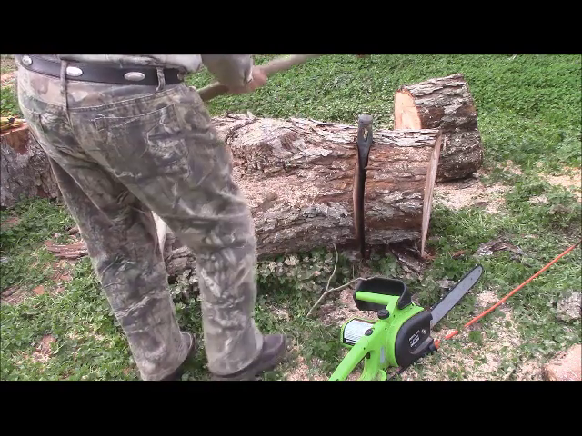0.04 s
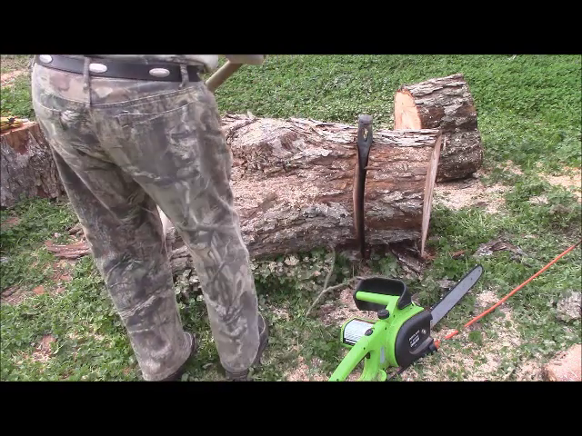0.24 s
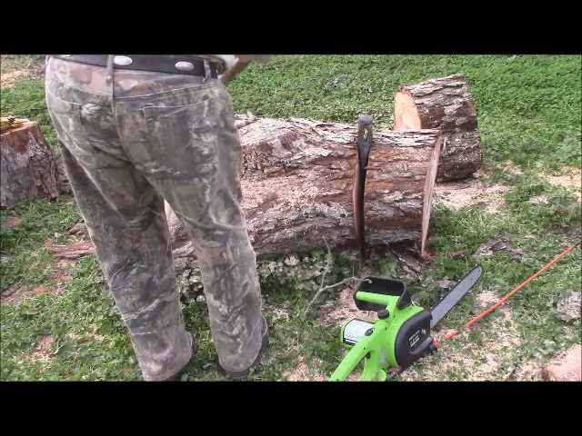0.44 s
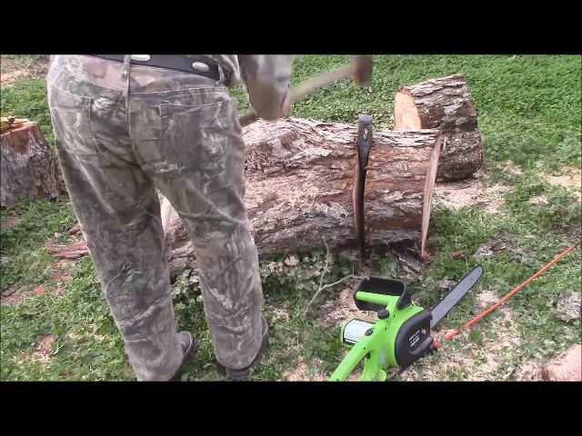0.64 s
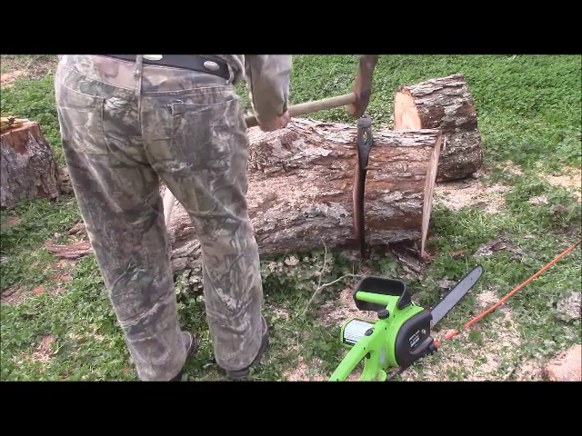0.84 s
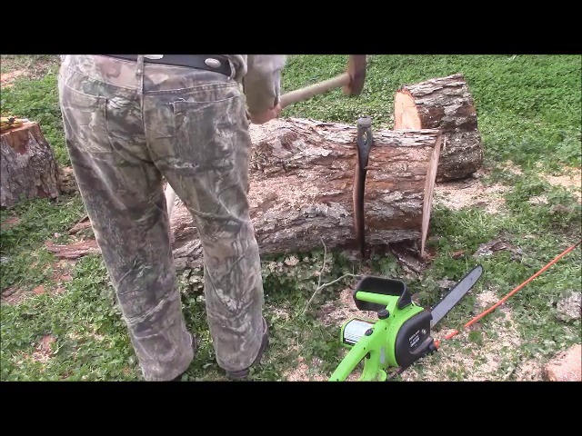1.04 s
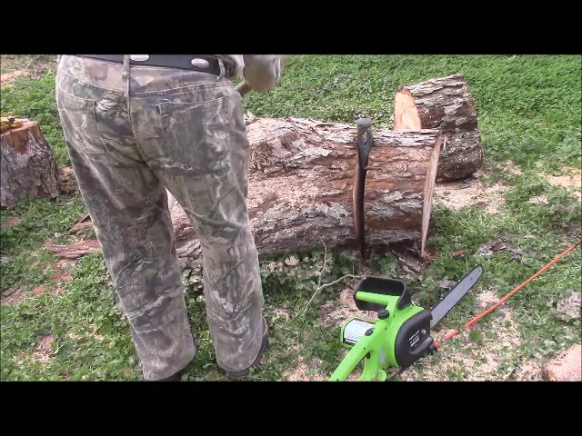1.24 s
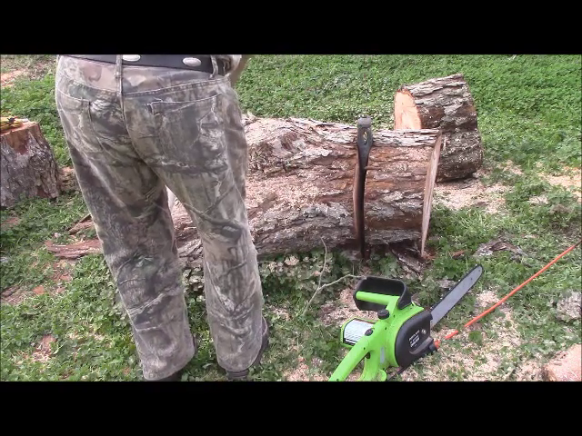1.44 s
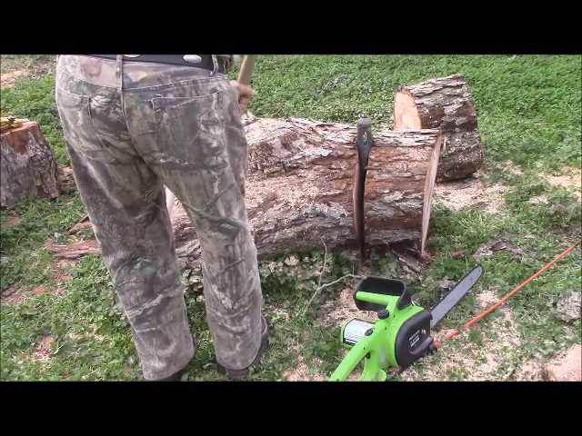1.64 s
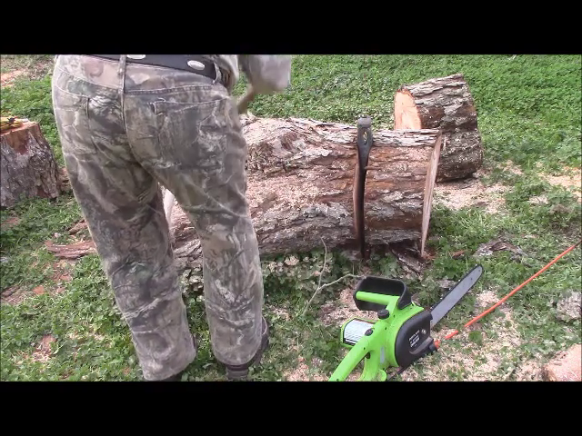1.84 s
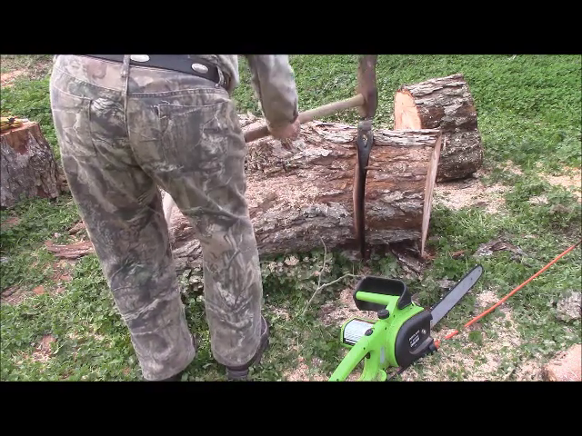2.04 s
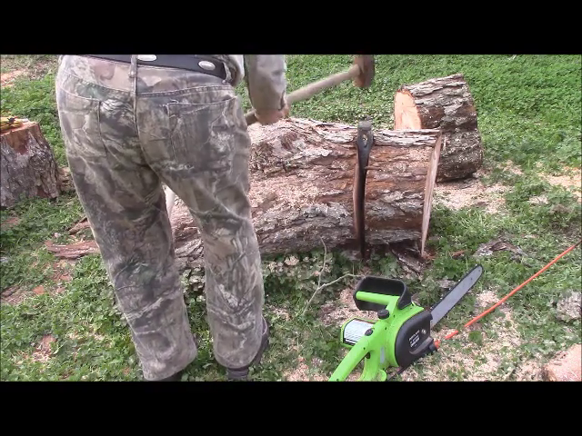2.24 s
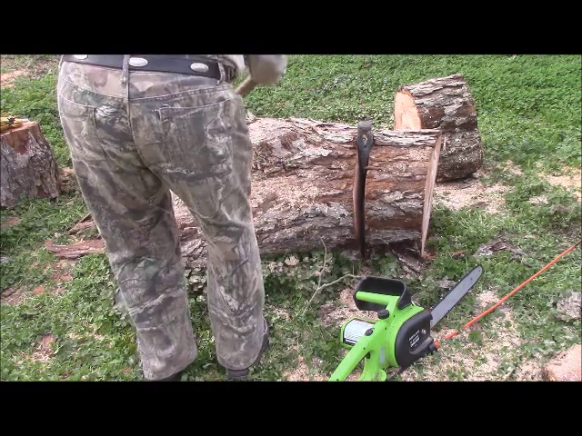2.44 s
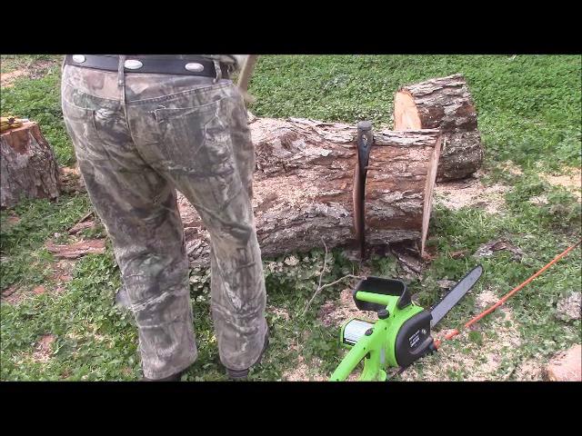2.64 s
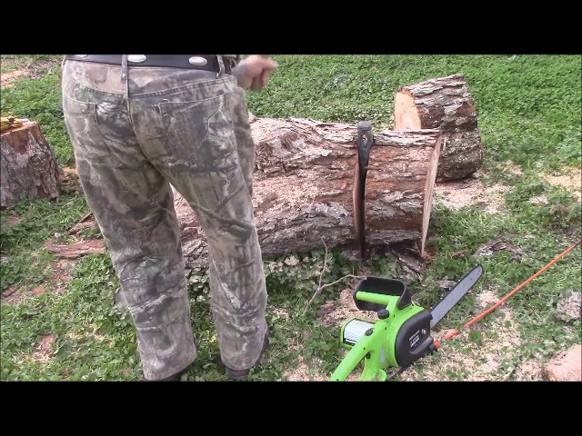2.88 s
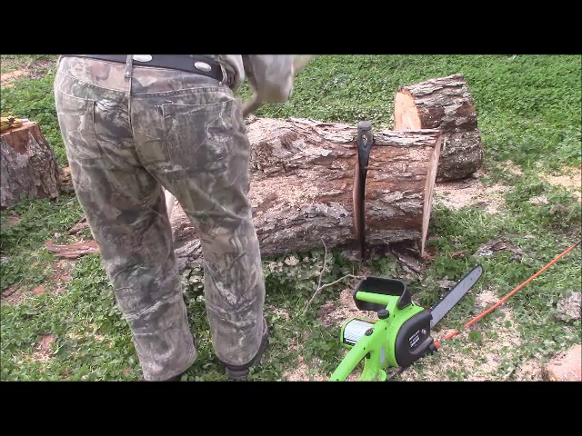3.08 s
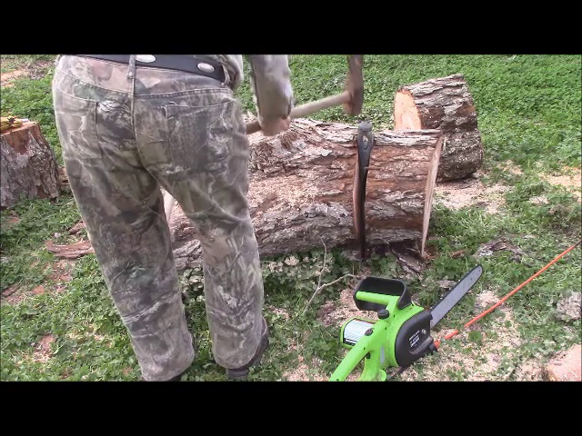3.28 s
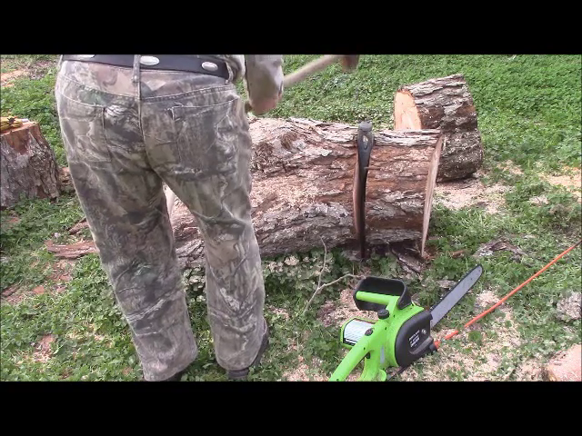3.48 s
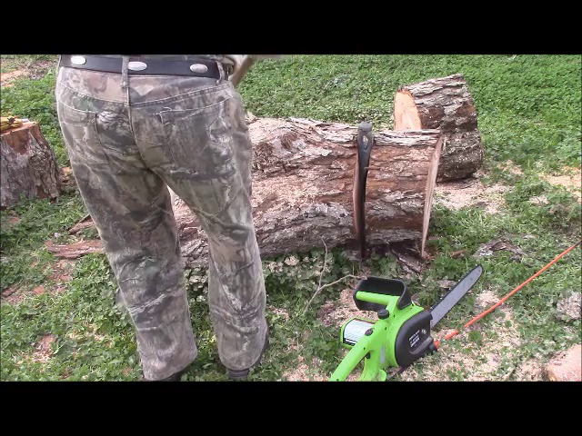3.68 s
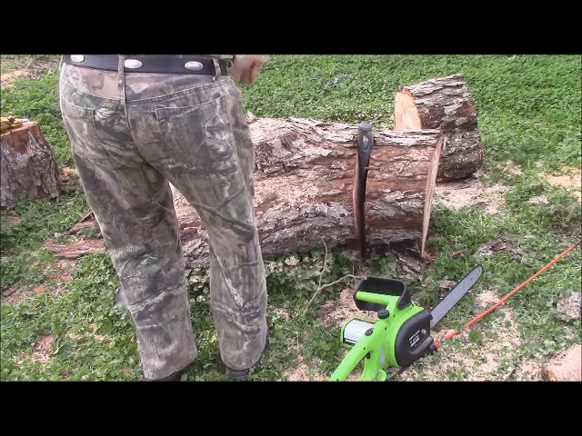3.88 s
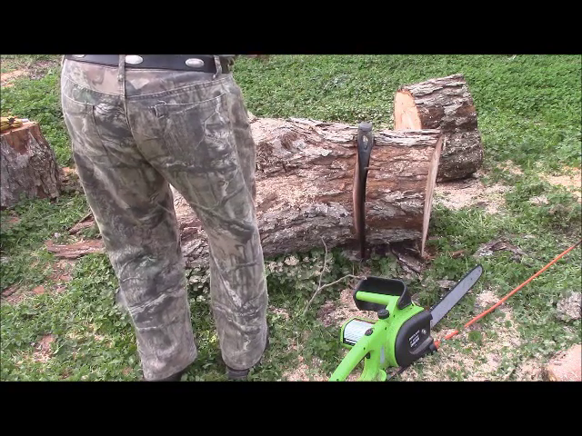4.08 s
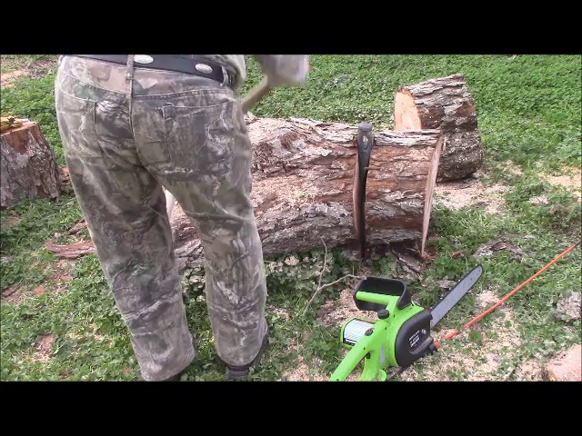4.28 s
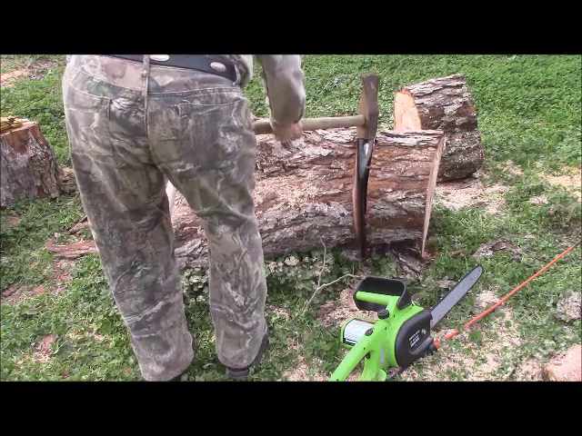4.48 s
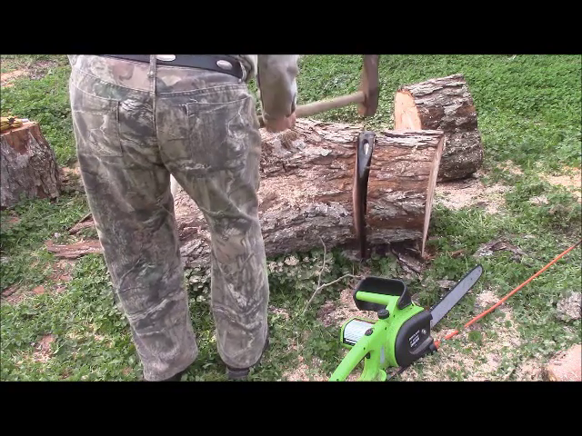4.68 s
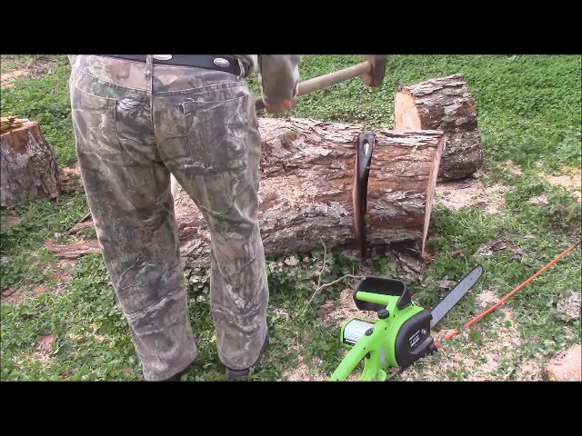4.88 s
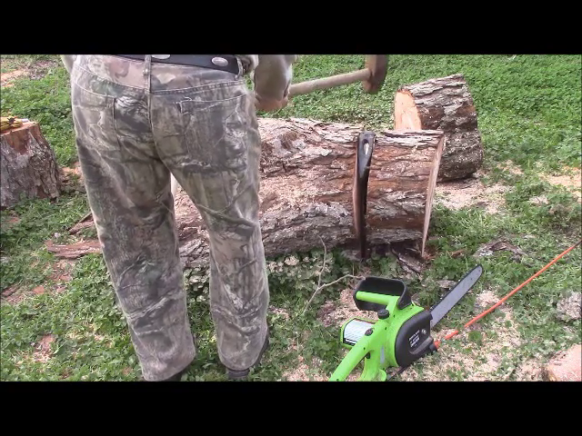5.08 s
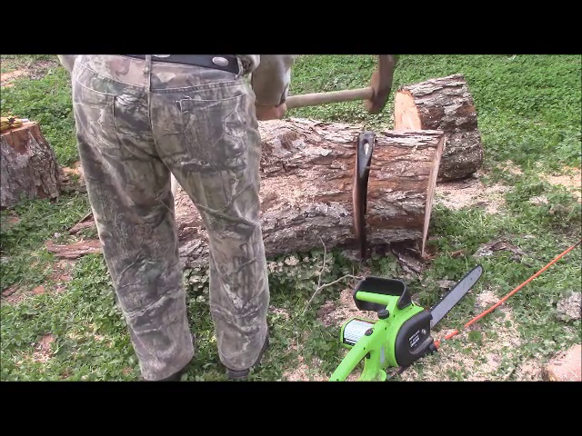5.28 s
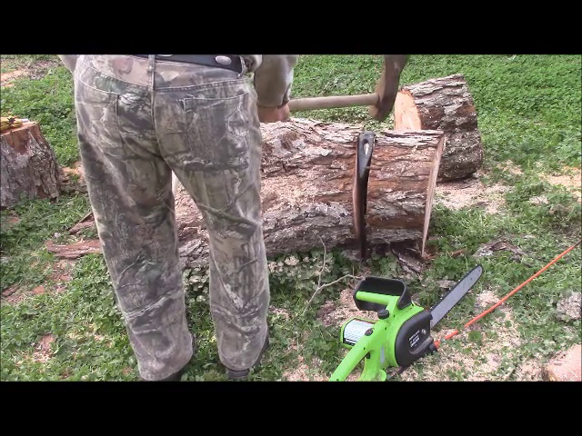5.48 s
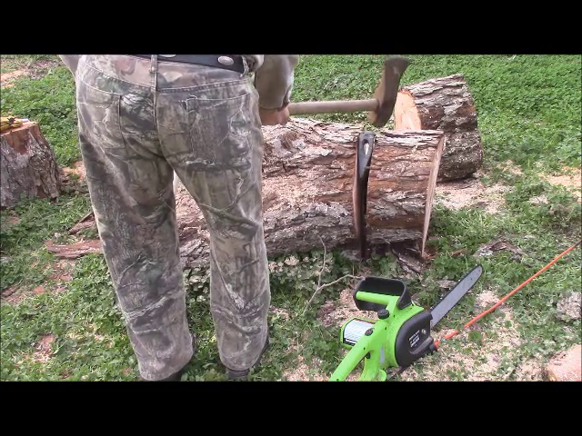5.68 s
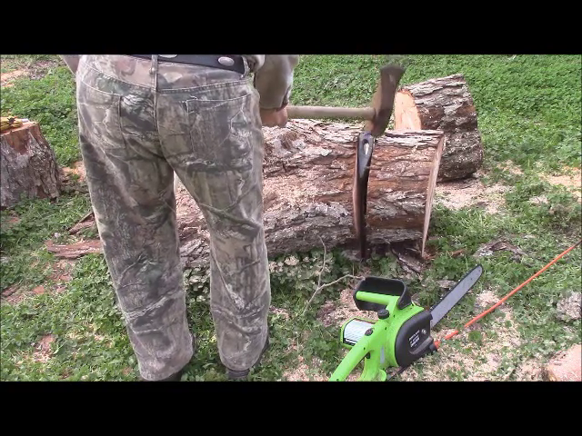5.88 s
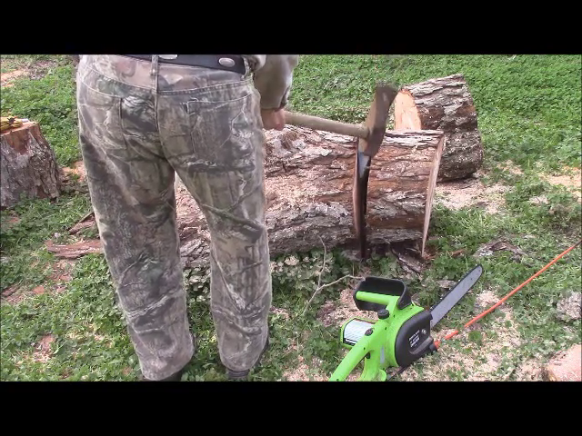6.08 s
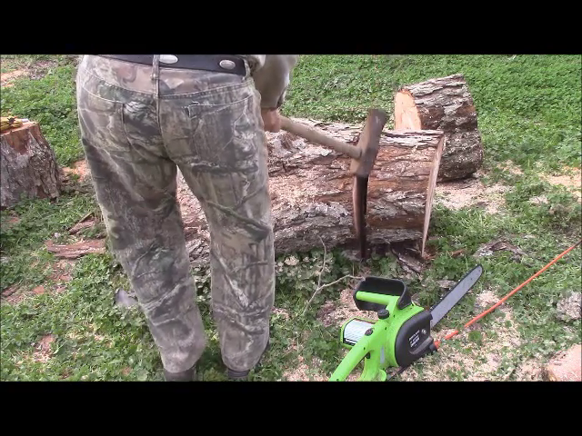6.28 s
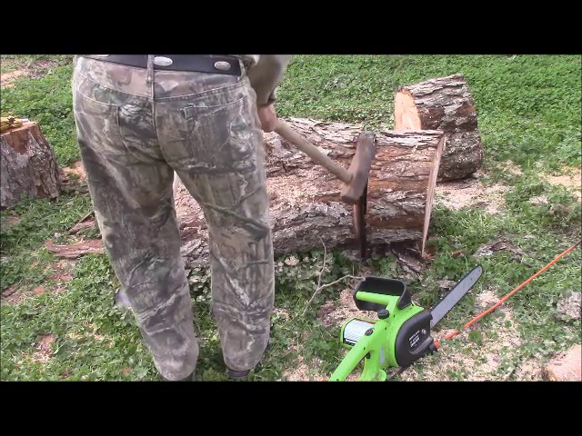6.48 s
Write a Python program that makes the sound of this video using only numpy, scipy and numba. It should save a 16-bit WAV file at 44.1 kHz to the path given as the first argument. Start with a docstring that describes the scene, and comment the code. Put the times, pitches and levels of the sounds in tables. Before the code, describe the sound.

Four evenly spaced hammer blows clang on a metal splitting wedge, with wooden thuds, wavering ringing and gusts on the microphone.

```python
"""Splitting a log with a sledge hammer

A sledge hammer hits a steel wedge in a log four times, a few metres away on a lawn. Each blow cracks,
thuds in the wood and echoes off far walls. The steel head rings on and wavers as it is lifted, because
its sound mixes with its own reflection. Wind buffets the microphones over faint birds, cloth and ticks,
and a limiter turns the loudest moments down."""
import sys
import numpy as np
from scipy import signal
from scipy.fft import rfft, irfft, next_fast_len
from scipy.io import wavfile
from scipy.ndimage import uniform_filter1d
from numba import njit

SR = 44100
rng = np.random.default_rng(int(sys.argv[2]) if len(sys.argv) > 2 else 0)


def generate_wav(signal):
    """Clip the signal to [-1, 1] and save it as 16-bit WAV at the path in sys.argv[1]."""
    frames = np.transpose(np.atleast_2d(signal))
    scaled = np.clip(frames, -1, 1) * 32767
    pcm = np.round(scaled).astype(np.int16)
    wavfile.write(sys.argv[1], SR, pcm)


N = 287532


def undb(db):
    """Turn decibels into a gain."""
    return 10 ** (np.asarray(db, float) / 20)


def fade(t, ring_s):
    """A smooth decay. The ring time is how long it takes to lose 60 dB."""
    return np.exp(-np.log(1000) * t / ring_s)


def noise(colour, count=N):
    """Noise of average (rms) level 1, its tone shaped by rows of (Hz, dB)."""
    hz, db = np.transpose(colour)
    size = next_fast_len(count)
    bins_hz = np.maximum(np.arange(size // 2 + 1) * SR / size, 1)
    gain = undb(np.interp(np.log(bins_hz), np.log(hz), db))
    x = irfft(rfft(rng.standard_normal(size)) * gain, size)[:count]
    return x / np.std(x)


def resonate(x, hz, width_hz):
    """Favour the sound around one pitch."""
    return signal.lfilter(*signal.iirpeak(hz, hz / width_hz, SR), x)


def bandpass(x, low_hz, high_hz):
    """Keep the sound between two pitches and scale it to average level 1."""
    y = signal.sosfilt(signal.butter(3, [low_hz, high_hz], "bandpass", fs=SR, output="sos"), x)
    return y / np.std(y)


def wander(rate, count=N):
    """A smooth random curve that takes a new value `rate` times a second."""
    hold = int(SR / rate)
    steps = np.repeat(rng.standard_normal(count // hold + 1), hold)
    return uniform_filter1d(uniform_filter1d(steps, hold), hold)[:count]


def spread(x):
    """Plus on the left, minus on the right: this makes a sound wide."""
    return x * np.array([[1], [-1]])


def add(out, start_s, x, pan_db=0):
    """Mix x into both channels; a positive pan moves it left."""
    i = int(start_s * SR)
    out[:, i:i + x.shape[-1]] += undb(spread(pan_db / 2)) * x[..., :N - i]


def curves(table, t):
    """Join a table's rows with straight lines and read each column at the times t."""
    times, *columns = np.transpose(table)
    return [np.interp(t, times, column) for column in columns]


# The tone of the murmur. Each row: frequency in Hz, relative level in dB.
MURMUR_TONE = [(21, -56.5), (35, -24.5), (317, -2), (602, -4), (1590, -15), (1770, -16.5), (3100, -20),
               (3620, -23), (6360, -26.5), (16000, -37)]
# How the tone of its wide part differs. Each row: frequency in Hz, change in dB.
MURMUR_WIDTH = [(60, 1), (110, -9), (200, -12), (380, -17), (700, -15.5), (1290, -16.5), (2380, -9),
                (4400, -14.5), (8120, -13), (15000, -11)]
# Its slow swell. Each row: time in seconds, level in dB.
MURMUR_SWELL = [(0, -60.5), (.7, -62), (1.5, -63), (1.9, -62), (3, -61), (3.8, -59), (4.9, -65),
                (5.4, -61.5), (6, -62), (6.52, -59.5)]


def distant_murmur():
    """Far leaves and roads blend into a soft noise that swells slowly."""
    hz, change_db = np.transpose(MURMUR_WIDTH)
    wide_tone = [(f, db + np.interp(np.log(f), np.log(hz), change_db)) for f, db in MURMUR_TONE]
    swell_db, = curves(MURMUR_SWELL, np.arange(N) / SR)
    level = undb(swell_db + 1.7 * wander(3.6))
    return level * (noise(MURMUR_TONE) + undb(-10) * spread(noise(wide_tone)))


# The breeze between gusts. Each row: time in seconds, level in dB.
BREEZE = [(0, -69), (.7, -67), (.95, -74), (1.3, -68.5), (1.5, -64.5), (2.5, -59.5), (3.1, -61.5),
          (3.7, -61), (4.4, -61.5), (4.7, -71), (5.1, -74), (5.4, -66.5), (5.9, -69), (6.52, -71.5)]
# Gusts. Each row: time of full strength in seconds, seconds it holds, level in dB.
GUSTS = [(0, 0.017, -57), (0.179, 0.055, -50), (0.394, 0.11, -44.5), (0.704, .01, -56.5),
         (1.384, 0.012, -48), (1.555, .01, -61), (1.694, 0.011, -51), (1.876, 0.0086, -53.5),
         (2.098, .01, -46), (2.23, 0.18, -40), (2.71, 0.011, -54), (2.788, 0.031, -49),
         (3.156, 0.0096, -55), (3.423, 0.0061, -41.5), (3.51, 0.019, -41.5), (3.856, .05, -35.5),
         (3.925, 0.11, -34), (4.113, 0.014, -34.5), (4.21, 0.038, -38.5), (4.355, 0.0076, -45),
         (4.75, 0.011, -56.5), (5.186, 0.0089, -56), (5.3, 0.0095, -63), (5.501, 0.12, -52.5),
         (5.686, .01, -49), (6.012, .01, -53.5), (6.438, .01, -68.5)]
GUST_RISE_DB_PER_S, GUST_FALL_DB_PER_S = 422.5, 190.5


def wind_level_db():
    """A wavering breeze, plus gusts that rise fast, hold and die away."""
    t = np.arange(N) / SR
    power = undb(curves(BREEZE, t)[0] + 6 * wander(12)) ** 2
    for full_s, hold_s, db in GUSTS:
        before_db = GUST_RISE_DB_PER_S * np.maximum(full_s - t, 0)
        after_db = GUST_FALL_DB_PER_S * np.maximum(t - full_s - hold_s, 0)
        power += undb(db - before_db - after_db) ** 2
    return 10 * np.log10(power)


# The strongest single swirls of air. Each row: time in seconds, level in dB, pan in dB.
PUFFS = [(0.019, -44.5, 7), (0.25, -43, 11), (0.385, -32.5, 4), (0.438, -29, 3.5), (1.376, -44, 11.5),
         (2.221, -34.5, 5), (2.317, -30.5, -8), (2.397, -27.5, -4), (3.864, -32, 9), (3.936, -24, 18),
         (3.948, -27, 19), (3.989, -26, 1.5), (4.001, -24.5, 11), (4.056, -26, -7), (4.094, -26.5, 8),
         (4.238, -25, 3.5), (4.272, -26, 5), (5.189, -54, -3), (5.673, -37, 1), (6.006, -40, -4.5)]


def wind():
    """Swirls of air push softly on the microphones, sounding brighter in stronger gusts."""
    level_db = wind_level_db()
    bright = np.clip((level_db + 55.5) / 31, 0, 1)
    rumbles = []
    for _ in range(2):
        arrivals = rng.random(N) < 300 / SR  # about 300 swirls a second
        swirls = arrivals * rng.standard_normal(N) * undb(2 * wander(40))
        rumble = (1 - bright) * bandpass(swirls, 60, 190) + bright * bandpass(swirls, 80, 320)
        rumbles.append(undb(level_db) * rumble)
    out = rumbles[0] + undb(-7.5) * spread(rumbles[1])
    t = np.arange(-.012, .012, 1 / SR)
    push = np.cos(2 * np.pi * 190 * t + .4) * np.exp(-np.abs(t / .0022) ** 1.5)
    for time_s, db, pan_db in PUFFS:
        add(out, time_s - .009, undb(db) * push, pan_db)
    return out


# Bird chirps. Each row: start and length in seconds, first, lowest and last pitch in Hz, level in dB.
CHIRPS = [(.595, .05, 7200, 6800, 7200, -65.5), (5.32, 0.097, 7000, 6100, 8100, -69),
          (5.868, .045, 7500, 7050, 7560, -68)]


def far_birds(out):
    """Each chirp is a thin whistle whose pitch dips and rises again."""
    for start_s, length_s, first_hz, low_hz, last_hz, db in CHIRPS:
        progress = np.linspace(0, 1, int(length_s * SR))
        falling = (first_hz - low_hz) * (1 - progress / .3) ** 2
        rising = (last_hz - low_hz) * ((progress - .3) / .7) ** 2
        hz = low_hz + np.where(progress < .3, falling, rising)
        whistle = np.sin(2 * np.pi * np.cumsum(hz) / SR)
        add(out, start_s, undb(db - 5.2 * progress) * whistle * signal.windows.tukey(len(hz), .4))


# Rustles. Each row: middle in seconds, length in seconds, level in dB.
RUSTLES = [(0.094, 0.1, -63.5), (0.192, 0.21, -65.5), (1.447, .09, -76), (6.273, .18, -67.5)]


def cloth(out):
    """Cloth rustles with a grainy hiss that swells and fades."""
    for middle_s, length_s, db in RUSTLES:
        count = int(length_s * SR)
        grain = rng.standard_normal(count) * undb(1.7 * wander(105, count))
        hiss = resonate(resonate(grain, 8300, 5300), 3800, 9000)
        swell = np.sin(np.linspace(0, np.pi, count))
        add(out, middle_s - length_s / 2, undb(db) * swell * hiss / np.std(hiss))


# Ticks. Each row: start in seconds, peak level in dB, centre pitch in Hz, width of the band in Hz.
TICKS = [(1.318, -54.5, 1800, 900), (1.651, -53, 2262, 1000), (2.412, -56, 8500, 5000),
         (2.433, -55, 7900, 4000), (2.582, -54, 2160, 800), (2.587, -57, 8700, 7000),
         (2.6, -58, 8850, 4000), (2.617, -64, 9000, 3000), (2.853, -52.5, 2300, 800),
         (3.515, -56.5, 7380, 3000), (3.551, -55, 8650, 3500), (4.628, -56, 8000, 4000),
         (4.847, -70.5, 6100, 5000), (4.885, -66, 8000, 3000), (5.524, -63, 2570, 1000),
         (6.277, -53, 7500, 3000), (6.323, -53.5, 2270, 1200)]


def ticks(out):
    """Small dry ticks, each a tiny burst of noise around one pitch."""
    t = np.arange(SR // 50) / SR
    for start_s, db, hz, width_hz in TICKS:
        burst = rng.standard_normal(len(t)) * np.minimum(t / .0017, 1) * fade(t, .022)
        tick = resonate(resonate(burst, hz, width_hz), hz, width_hz)
        add(out, start_s, undb(db) * tick / np.max(np.abs(tick)))


# Echoes off far walls. Each row: delay in seconds, relative level in dB.
WALL_ECHOES = [(.058, -22.5), (0.071, -27.5), (.104, -24.5), (.166, -39.5), (0.178, -33)]
# The tone of what comes back. Each row: frequency in Hz, relative level in dB.
ECHO_TONE = [(60, -22), (150, 3), (340, 1.5), (550, -3.5), (1000, -1.5), (2000, -3.5), (3300, -6.5),
             (5500, -3.5), (8000, -30.5), (16000, -55.5)]


def garden_echo():
    """The garden's answer to a click: slaps off walls, then a tail from trees, which return little bass."""
    t = np.arange(SR) / SR
    wall_noise, tree_noise = [noise(ECHO_TONE, SR) + undb(-17) * spread(noise(ECHO_TONE, SR))
                              for _ in range(2)]
    walls = undb(-22.5) * np.clip(t / .075, 0, 1) ** 2 * fade(t, .3)  # a soft wash under the slaps
    for delay_s, db in WALL_ECHOES:
        since = np.maximum(t - delay_s, 0)
        walls += undb(db) * np.minimum(since / .00019, 1) * fade(since, .017)
    trees = undb(-42.5) * np.clip(t / .12, 0, 1) * fade(t, 1.44)
    return undb(-27) * (walls * wall_noise + trees * bandpass(tree_noise, 990, 5400))


# The log's own notes. Each row: pitch in Hz, full ring time in seconds.
LOG_NOTES = [(166, .25), (262, .15), (336, .13), (970, .05)]


def log_thud(start_s, levels_db, ring_share):
    """The struck log sounds a few low notes, which die sooner once the split opens."""
    out = np.zeros((2, N))
    t = np.arange(SR // 2) / SR
    for (hz, ring_s), db in zip(LOG_NOTES, levels_db):
        rough = resonate(rng.standard_normal(len(t)), hz, width_hz=68)  # damped wood has no pure pitch
        note = np.sin(2 * np.pi * hz * t) + .53 * rough / np.std(rough)
        add(out, start_s, undb(db) * note * fade(t, ring_s * ring_share) * np.minimum(t / .0023, 1))
    return out


# The hammer head's three main, long notes: their pitches in Hz.
LONG_HZ = [3525, 4989, 9590]
# One row per long note. Each row: ring time in seconds, then its base level in dB at each blow.
LONG_NOTES = [(.8, -15, -8, -16.5, -8.5), (.67, -18, -6, -12.5, -16.5), (0.54, -20.5, -13, -13, -23.5)]
# How much of each long note goes towards the reflecting side, in dB.
LONG_REFLECT_DB = [-1, -11.5, -7.5]
# The head's other, mostly shorter notes: their pitches in Hz, then rows like those of the long notes.
SHORT_HZ = [4907, 5364, 5372, 6286, 7052, 8515, 10885, 11000, 11772, 11968, 12866, 13280, 14158]
SHORT_NOTES = [(0.25, -13.5, -24.5, -4, -30.5), (.055, -43.5, -40.5, -37, -8),
               (0.74, -56.5, -57, -50.5, -48.5), (0.38, -32.5, -35, -34, -34.5),
               (0.28, -52.5, -54.5, -44.5, -36.5), (0.22, -28, -27.5, -41.5, -29),
               (0.46, -31, -26, -31.5, -35), (0.057, -18.5, -15, -12, -25), (0.14, -39, -41, -44, -44),
               (0.23, -40.5, -38, -42.5, -52), (0.22, -32, -35.5, -34, -48.5), (.1, -34, -36.5, -35, -41),
               (.3, -34.5, -41, -44, -47)]
# The reflection as the head is lifted, one list per blow.
# Each row: time in seconds, extra delay in milliseconds, base level in dB against the direct sound.
LIFT_REFLECTION = [
    [(.735, 0, -12), (.9, 0, -8), (.985, .142, -2), (1.1, .425, -.5), (1.2, .6, -8), (1.305, .709, -3),
     (1.6, 1.2, -8)],
    [(1.983, 0, -12), (2.14, 0, -8), (2.19, .142, -5), (2.262, .425, -2), (2.34, .709, -8),
     (2.461, .993, -1), (2.535, 1.277, -2), (2.587, 1.56, -1), (2.95, 2, -10)],
    [(3.188, 0, -12), (3.4, 0, -8), (3.478, .142, -2), (3.535, .425, -3), (3.64, .709, -.5),
     (3.715, .993, -1), (3.765, 1.277, -2), (4, 2, -6)],
    [(4.393, 0, -12), (4.6, 0, -8), (4.66, .142, -1), (4.795, .425, -1), (4.9, .56, -10), (5.5, .6, -12)],
]
# Loudness as the head rebounds and turns, one list per blow.
# Each row: time in seconds, level change in dB, extra change in dB for notes above TREBLE_HZ.
HEAD_FACING = [
    [(.735, -8.5, 0), (.79, -0.5, 4), (.82, 1, -0.5), (.865, 2.5, -11.5), (.93, 0, 0), (1.05, -1, 2.5),
     (1.38, -4.5, 0.5), (1.6, -4, 0)],
    [(1.983, -3.5, 0.5), (2.03, -2, -0.5), (2.15, 0, 0.5), (2.23, 1, 3.5), (2.3, 2.5, -3),
     (2.41, 2.5, -5.5), (2.58, -4, -3), (2.95, -5, 0)],
    [(3.188, -8, -5.5), (3.244, -0.5, 2), (3.28, 0.5, 0), (3.36, -1.5, 0), (3.56, 0, 2.5), (3.69, -2.5, -4),
     (4.0, -8, 5)],
    [(4.393, 1, -9), (4.42, 8, -10.5), (4.49, 2.5, -2.5), (4.537, -2.5, -2.5), (4.615, 3.5, -1),
     (4.68, -3, 7), (4.77, -7, 13.5), (5.0, 1.5, 2), (5.5, 11, 4)],
]
TREBLE_HZ = 6000
APPROACH_M_PER_S, APPROACH_S = .62, .56  # the head gains this speed towards the listener in this time
WAVER_DB, PAN_WAVER_DB = 1.36, 2  # each note beams its own way as the head turns


def head_ring(start_s, blow):
    """The steel head rings; as it moves, direct and reflected sound add up and cancel in turn."""
    out = np.zeros((2, N))
    end_s = HEAD_FACING[blow][-1][0]
    t = np.arange(int((end_s - start_s) * SR)) / SR
    delay_ms, reflection_db = curves(LIFT_REFLECTION[blow], start_s + t)
    facing_db, treble_db = curves(HEAD_FACING[blow], start_s + t)
    speed = APPROACH_M_PER_S * np.minimum(t / APPROACH_S, 1)
    heard_time = np.cumsum(1 + speed / 343) / SR  # coming closer raises the pitch (Doppler effect)
    edges = np.minimum(t / .002, 1) * np.minimum((t[-1] - t) / .042, 1)
    shares_db = LONG_REFLECT_DB + [-2.5] * len(SHORT_NOTES)
    notes = zip(LONG_HZ + SHORT_HZ, LONG_NOTES + SHORT_NOTES, shares_db)
    for hz, (ring_s, *levels_db), share_db in notes:
        phase = 2 * np.pi * (hz * heard_time + rng.random())
        reflected = undb(share_db + reflection_db) * np.sin(phase - 2 * np.pi * hz * delay_ms / 1000)
        db = levels_db[blow] + facing_db + treble_db * (hz > TREBLE_HZ) + WAVER_DB * wander(14, len(t))
        sway_db = spread(PAN_WAVER_DB * wander(9, len(t)) / 2)
        note = (np.sin(phase) + reflected) * undb(db + sway_db) * fade(t, ring_s) * edges
        add(out, start_s, note, pan_db=rng.normal(-.48, .52))
    return out


# The tone of the crack. Each row: frequency in Hz, relative level in dB.
CRACK_TONE = [(90, -29), (170, -6.5), (340, -3.5), (620, -4.5), (1000, -1.5), (1500, -2.5), (2100, -6.5),
              (2800, -2), (4100, -11), (5000, -8), (8000, -26), (11000, -8.5), (16000, -42)]


def steel_contact(ring_s, splinter_db):
    """Steel meets steel once: a sharp snap and a burst of splintery noise."""
    t = np.arange(SR // 10) / SR
    snap = 2 * np.sin(2 * np.pi * 2400 * t) * np.minimum(t / .0004, 1) * fade(t, .005)
    splinters = noise(CRACK_TONE, len(t)) * np.minimum(t / .0013, 1) * fade(t, ring_s)
    return snap + undb(splinter_db) * splinters


# Small extra contacts just after the blows. Each row: start in seconds, level in dB.
CHATTER = [(.7445, -6.5), (0.7494, -6), (0.7697, -17.5), (1.9875, -5), (3.1885, -21), (3.2035, -20),
           (4.3975, -15), (4.4115, -20)]


def wedge_crack(start_s, crack_db):
    """The head hits the wedge, then chatters against it."""
    out = np.zeros((2, N))
    add(out, start_s, undb(crack_db) * steel_contact(ring_s=.062, splinter_db=-2.5))
    for chatter_s, db in CHATTER:
        if start_s < chatter_s < start_s + .1:
            add(out, chatter_s, undb(db) * steel_contact(ring_s=.02, splinter_db=-9))
    return out


# The four blows. Each row: start in seconds, crack level in dB, a level in dB for each of the four log
# notes, echo strength of crack and ring in dB, share of the log's ring time that is left.
BLOWS = [(0.7347, -4, -23, -45, -29.5, -25, -1, 1), (1.9825, -2, -24.5, -33.5, -23.5, -25.5, -1, 0.64),
         (3.188, -2.5, -18.5, -17.5, -7.5, -25.5, 2.5, 0.71),
         (4.3925, -6, -21.5, -17, -15.5, -23.5, -4.5, 0.8)]


def hammer_blows(out):
    """Each blow cracks, thuds and rings, and the garden sends all three back."""
    garden = garden_echo()
    for blow, (start_s, crack_db, *log_db, echo_db, ring_share) in enumerate(BLOWS):
        crack = wedge_crack(start_s, crack_db)
        thud = log_thud(start_s, log_db, ring_share)
        ring = head_ring(start_s, blow)
        out += crack + thud + ring
        # the bass spreads all round; crack and ring reach the walls as the head happens to face
        to_walls = undb(2) * thud + undb(echo_db) * (crack + undb(-13) * ring)
        i = int(start_s * SR)
        add(out, start_s, signal.fftconvolve(to_walls[:1, i:i + SR], garden, axes=1))


def scene():
    """All the sounds as they reach the two microphones."""
    out = distant_murmur() + wind()
    hammer_blows(out)
    cloth(out)
    ticks(out)
    far_birds(out)
    return out


LIMIT_DB, RELEASE_S, ATTACK_SAMPLES, CEILING = -15, .031, 220, .44
LOW_CUT_HZ, HIGH_CUT_HZ = 60, 15750


@njit
def limiter(peaks, limit, release):
    """A gain that drops at once when a peak passes the limit, and recovers slowly."""
    gain, held = np.empty(len(peaks)), 0.
    for i in range(len(peaks)):
        held = peaks[i] if peaks[i] > held else held + (peaks[i] - held) * release
        gain[i] = min(1., limit / (held + 1e-9))
    return gain


def record(dry):
    """The microphones lose deep bass and top treble; the limiter acts late, so the first peaks clip."""
    dry = signal.sosfilt(signal.butter(2, LOW_CUT_HZ, "highpass", fs=SR, output="sos"), dry)
    peaks = uniform_filter1d(np.abs(dry).max(axis=0), size=64)
    gain = limiter(peaks, float(undb(LIMIT_DB)), 1 / (RELEASE_S * SR))
    late_gain = signal.lfilter([1 / ATTACK_SAMPLES], [1, 1 / ATTACK_SAMPLES - 1], gain - 1) + 1
    limited = dry * late_gain
    clipped = limited / (1 + (limited / CEILING) ** 12) ** (1 / 12)  # clean below the ceiling
    return signal.sosfilt(signal.ellip(8, .2, 70, HIGH_CUT_HZ, fs=SR, output="sos"), clipped)


dry = scene()
out = record(dry)
generate_wav(out)
```